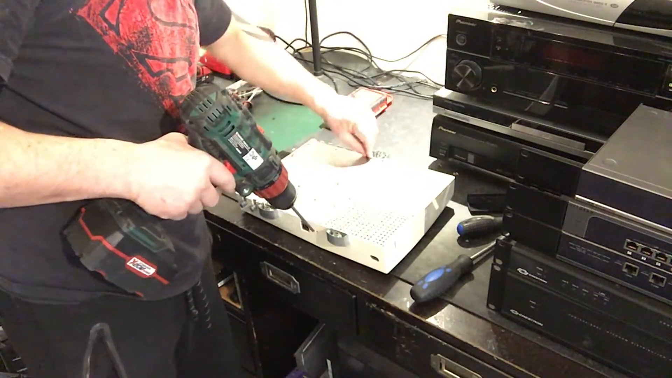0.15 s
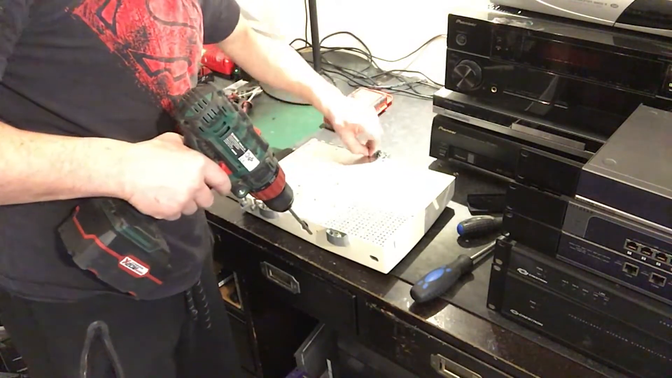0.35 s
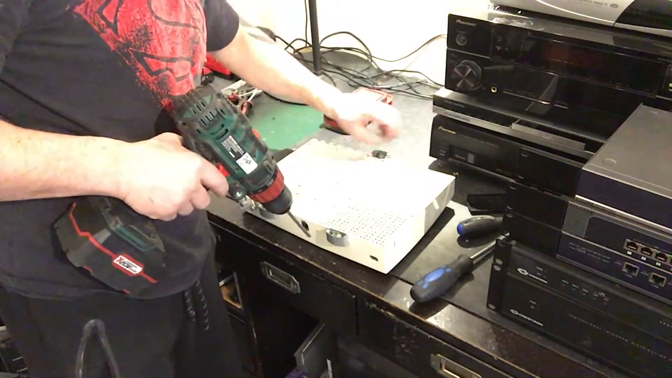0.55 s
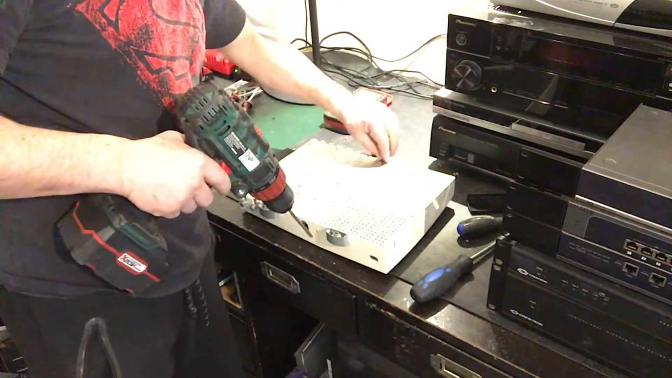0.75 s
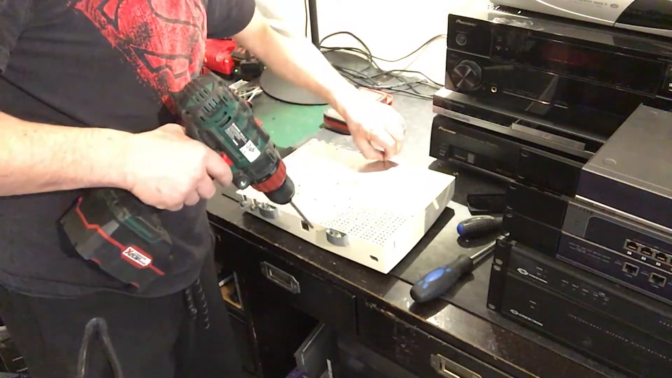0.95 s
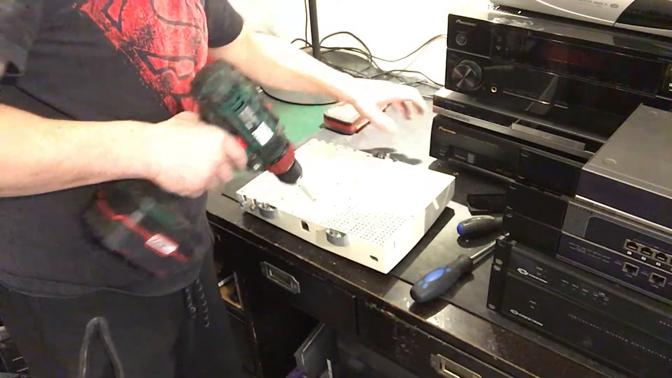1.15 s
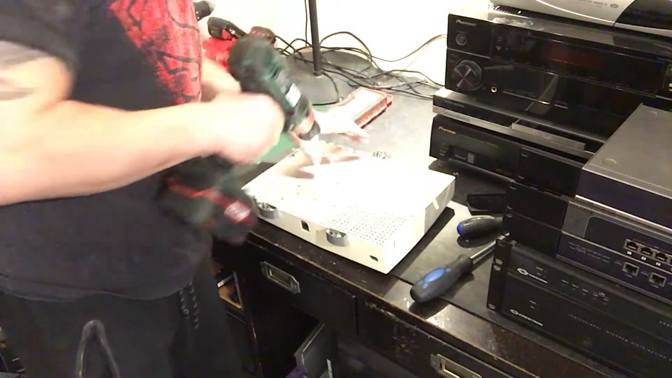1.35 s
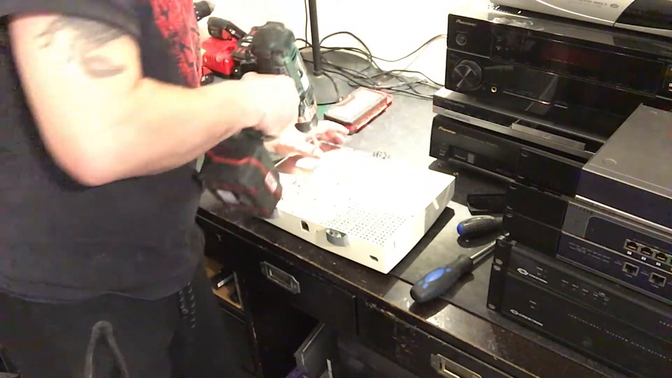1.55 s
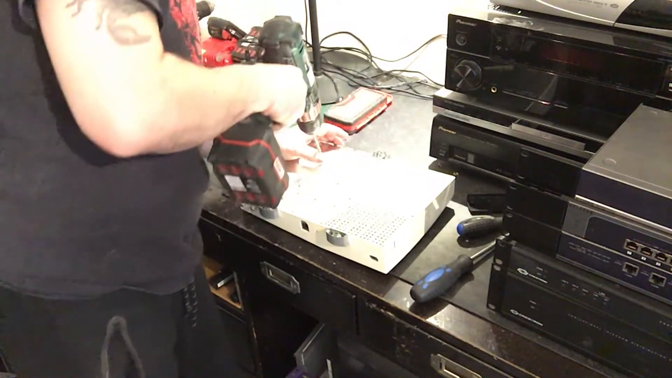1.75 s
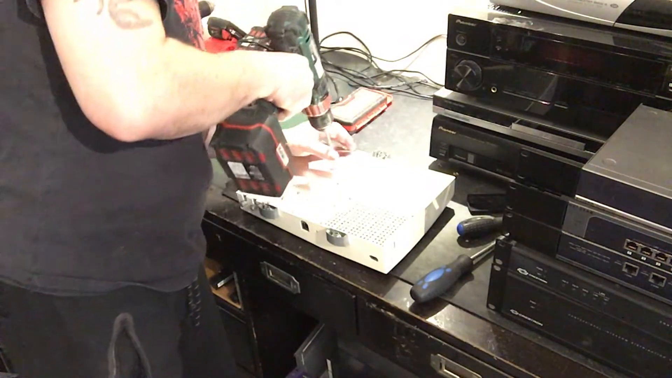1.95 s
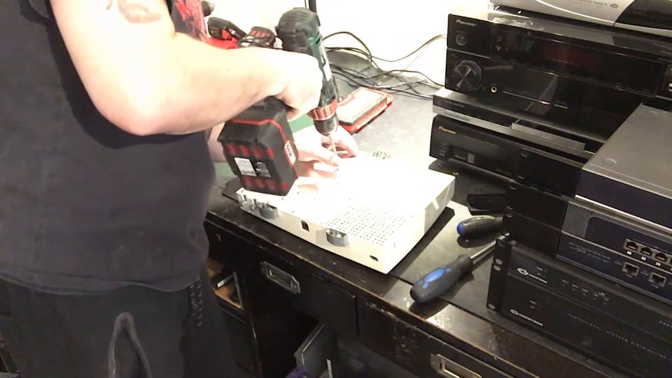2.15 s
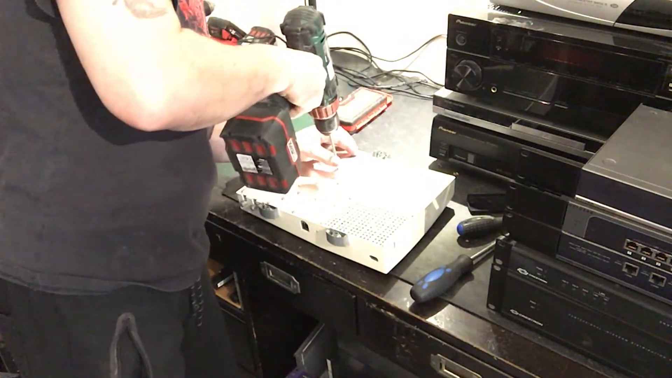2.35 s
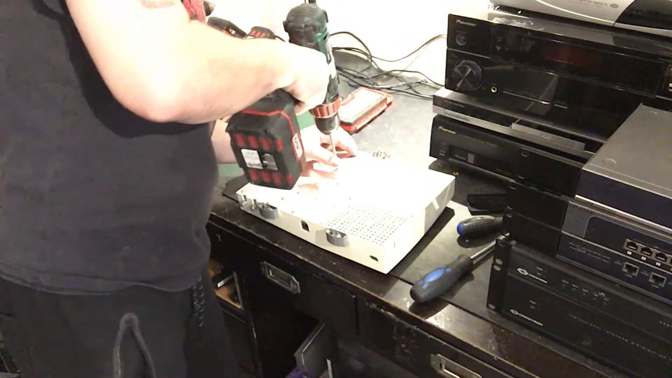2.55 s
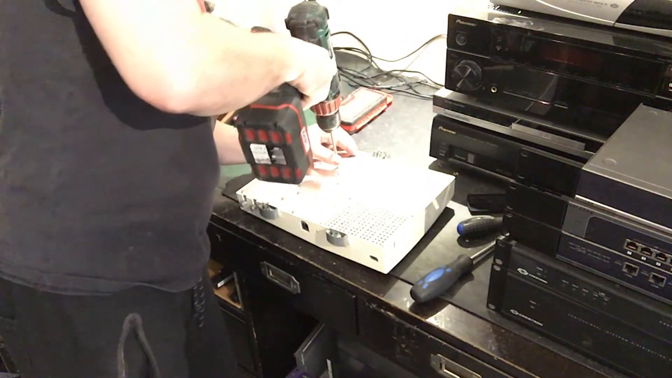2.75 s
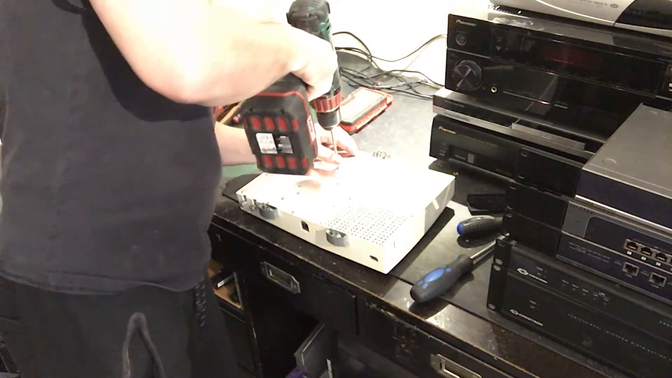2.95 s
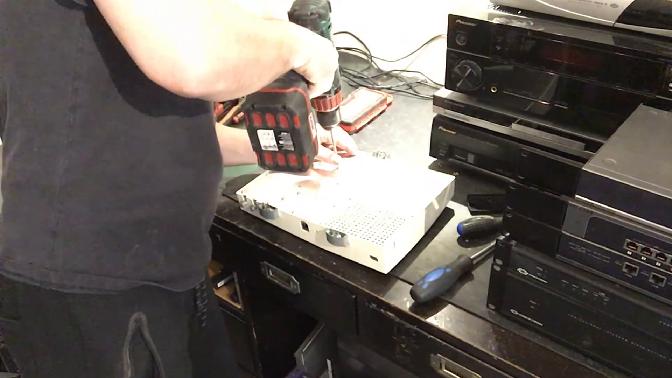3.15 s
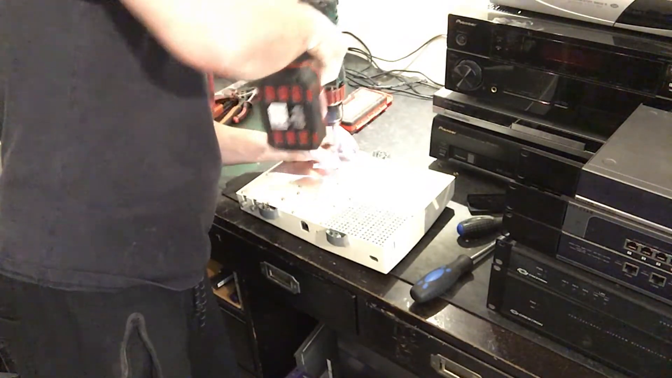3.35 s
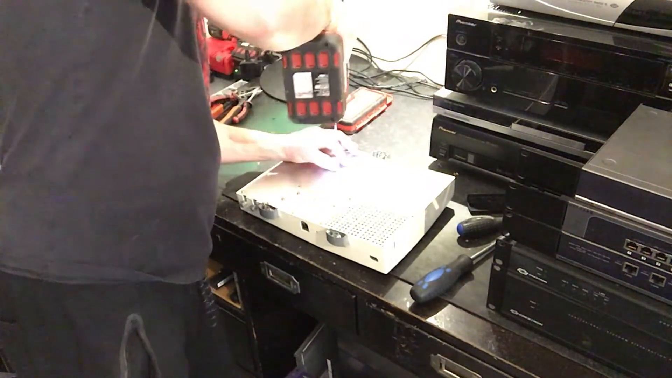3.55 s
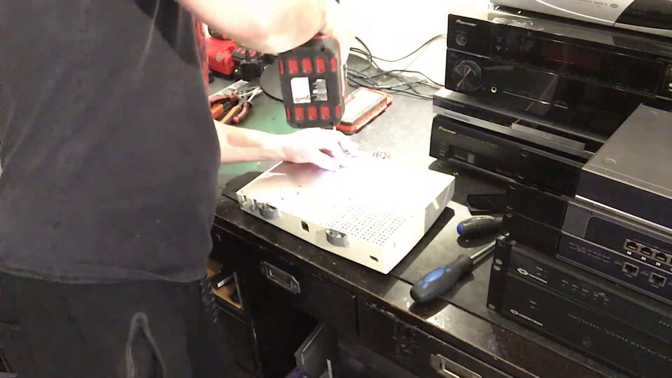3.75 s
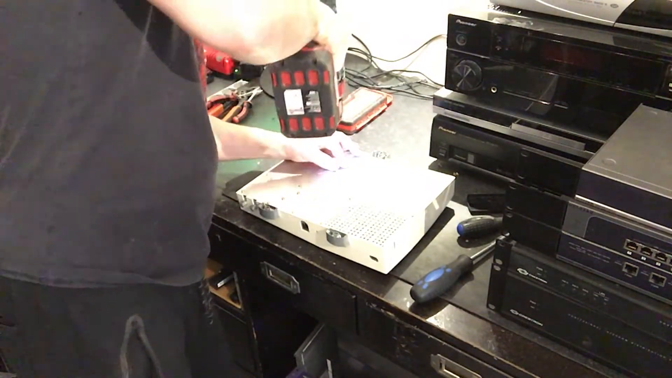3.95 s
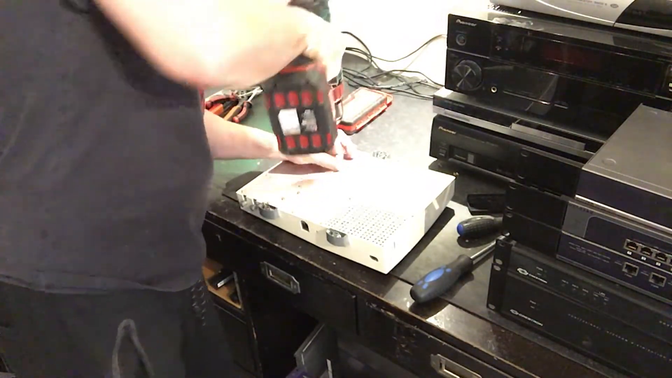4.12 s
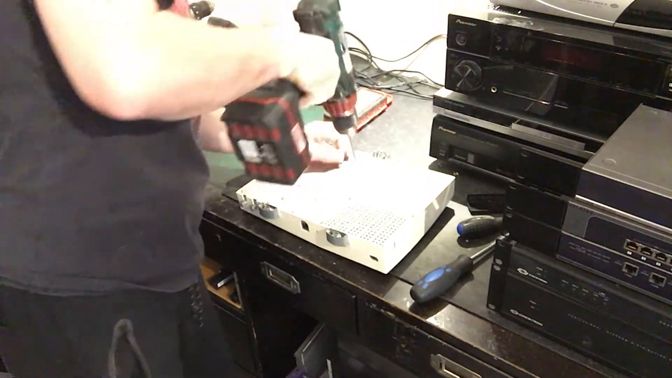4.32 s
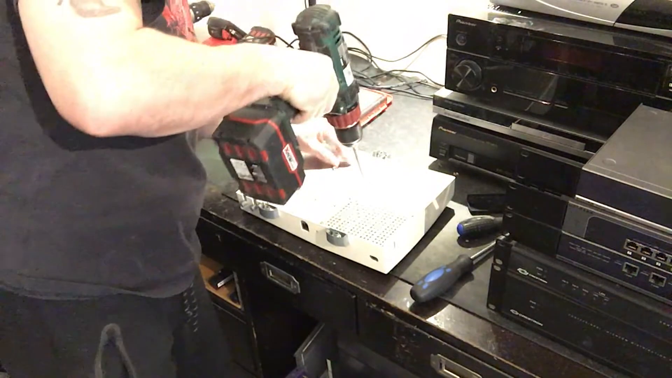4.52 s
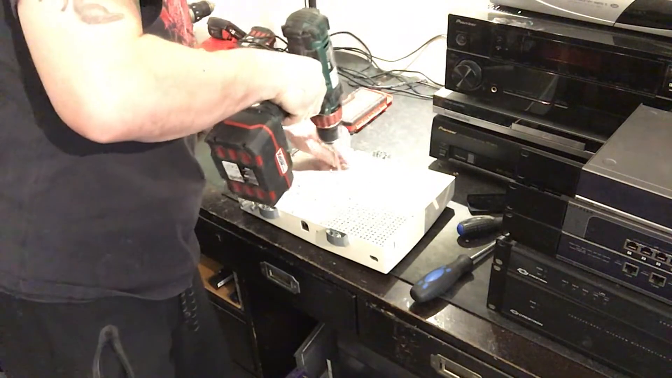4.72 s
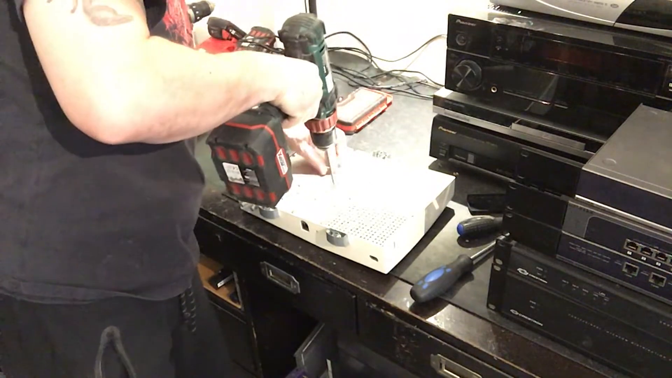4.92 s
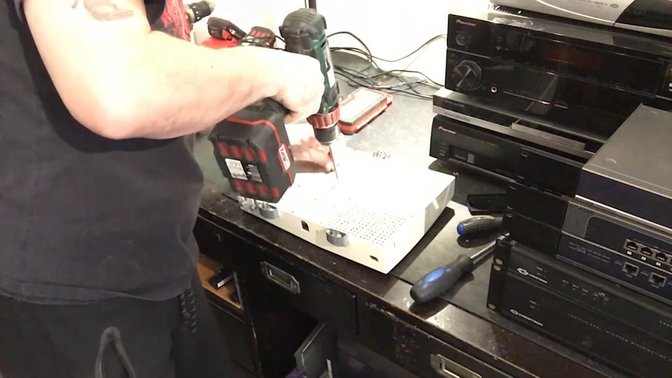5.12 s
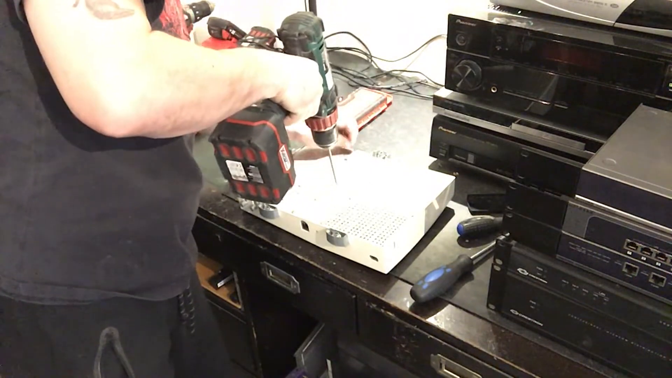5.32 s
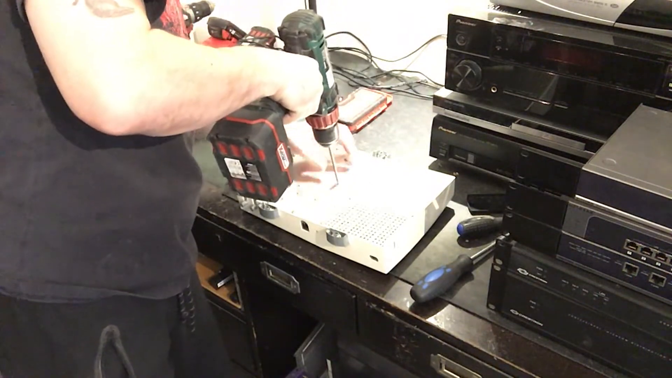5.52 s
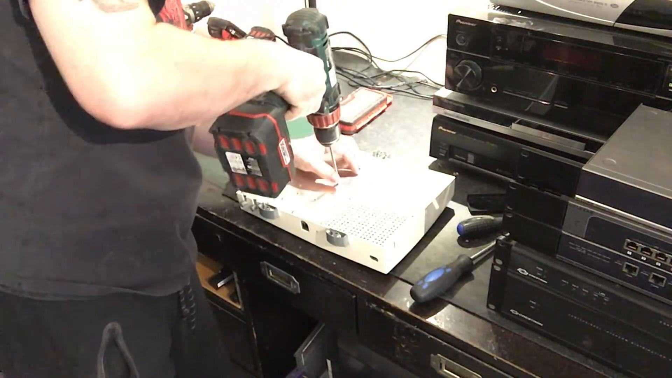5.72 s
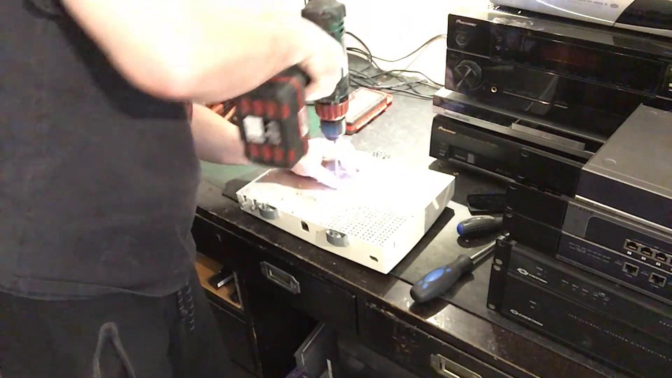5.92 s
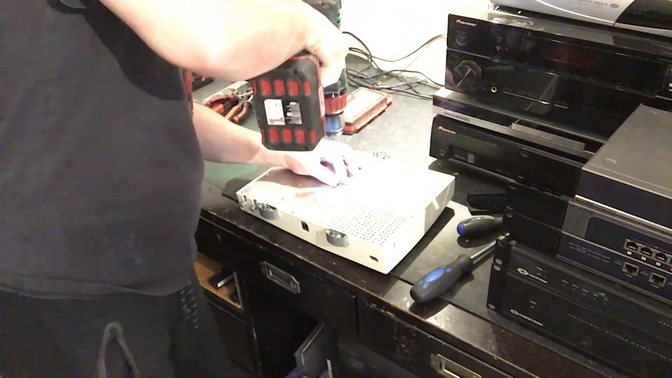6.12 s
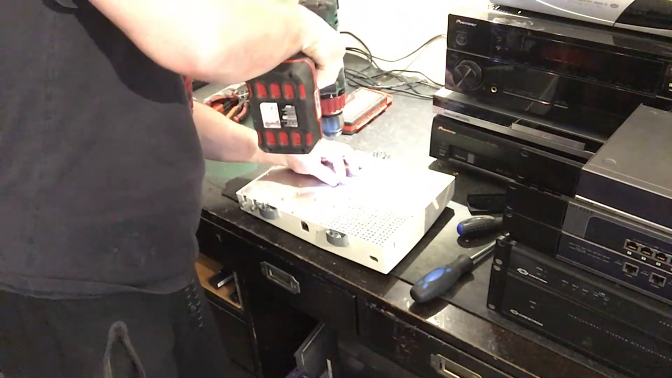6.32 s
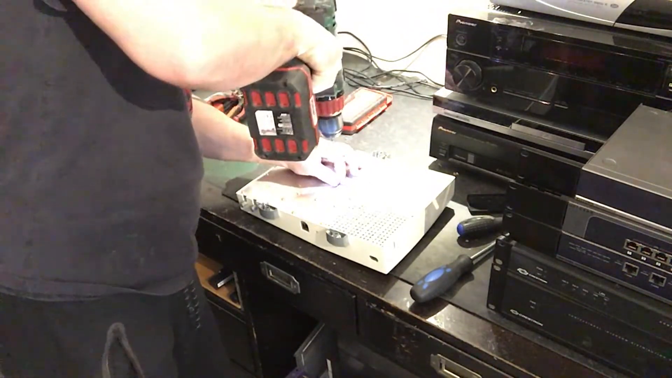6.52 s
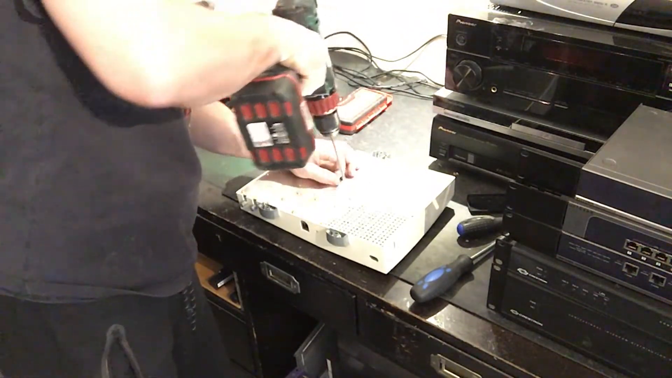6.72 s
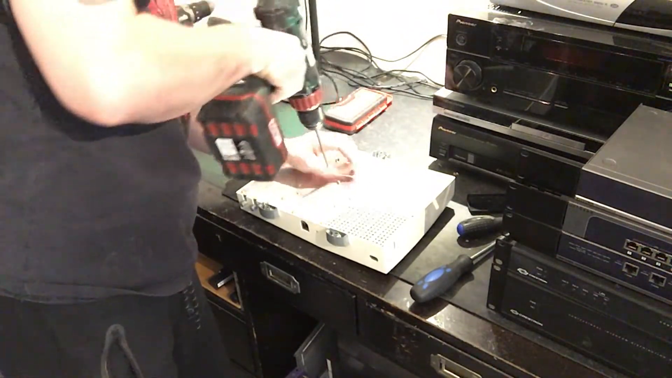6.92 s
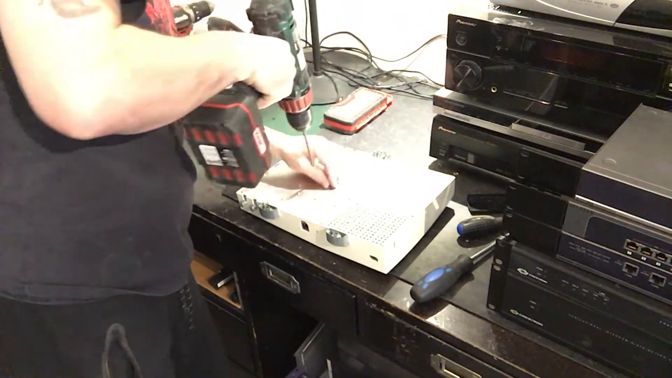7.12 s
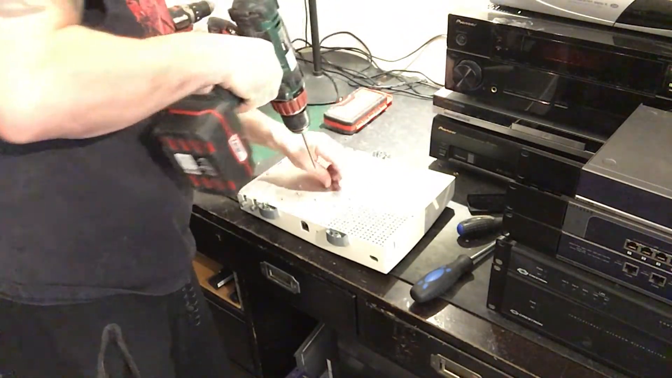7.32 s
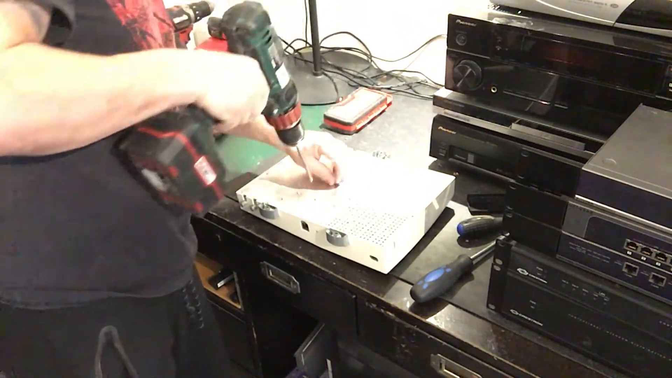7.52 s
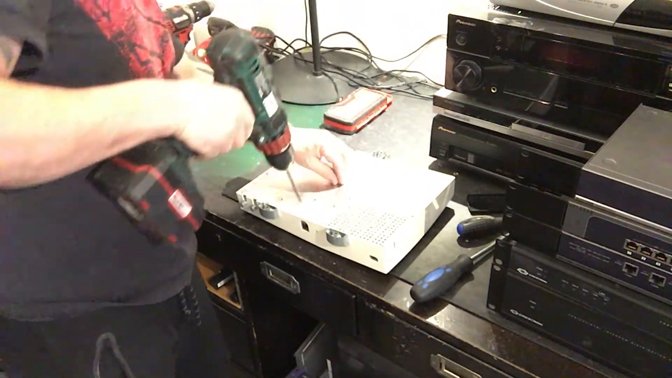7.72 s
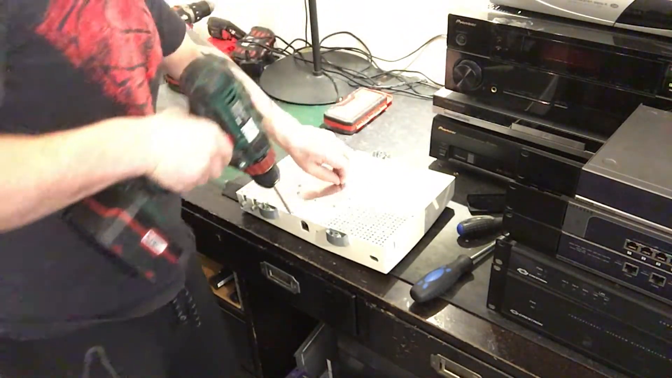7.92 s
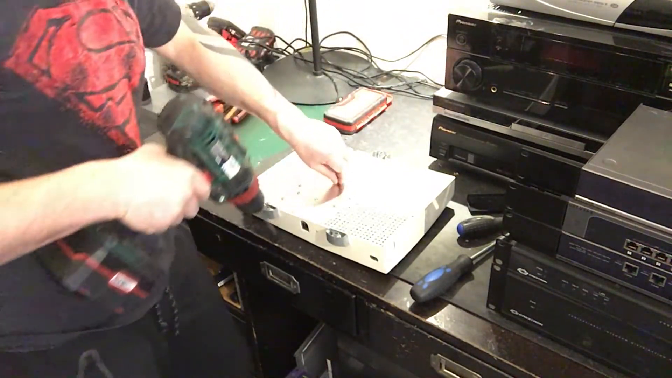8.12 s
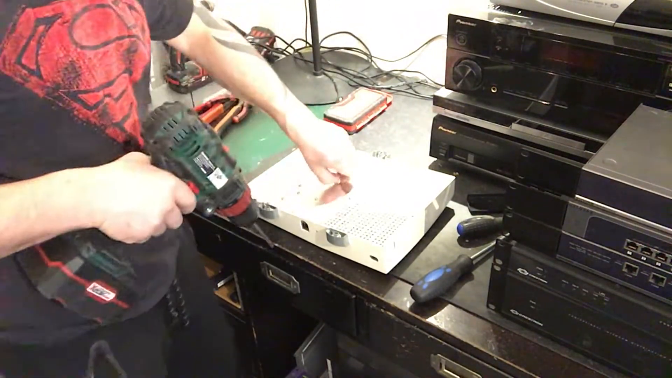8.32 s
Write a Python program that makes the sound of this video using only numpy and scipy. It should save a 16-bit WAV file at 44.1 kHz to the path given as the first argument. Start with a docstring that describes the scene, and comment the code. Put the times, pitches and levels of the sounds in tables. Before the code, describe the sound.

Taps and scrapes on a plastic case on a workbench, with two brief runs of a cordless screwdriver, each stopping with a clack.

```python
"""A cordless drill-driver backs two screws out of a plastic casing on a workbench in a small room.
Each time, its gear teeth clatter under a thin whine for most of a second, the loosened screw bumps
over its thread, and the brake stops the motor with a clack. The bit knocks about to find each screw
head, and firm knocks make the bench boom. In between, fingers slide over the lid and handle loose screws."""
import sys
import numpy as np
from scipy import signal
from scipy.fft import rfft, irfft, next_fast_len
from scipy.io import wavfile

SR = 44100
rng = np.random.default_rng(int(sys.argv[2]) if len(sys.argv) > 2 else 0)


def generate_wav(sig):
    """Save sig (samples, or channels by samples) to the path in sys.argv[1] as 16-bit PCM at SR."""
    pcm = np.round(np.clip(np.atleast_2d(sig).T, -1, 1) * 32767).astype(np.int16)
    wavfile.write(sys.argv[1], SR, pcm)


N = 373527

# One squeeze of the trigger per screw. Each row: pull in seconds, release in seconds,
# top speed in motor turns per second, speed wobble as a fraction, level in dB.
RUNS = [(3.527, 4.213, 455, .025, -32.5), (5.997, 6.705, 441, .004, -29.5)]
# The tone of the gear clatter in each run. Each row: frequency in Hz, relative level in dB.
FIRST_COLOUR = [(88, -38), (150, -1.5), (193, -9), (248, -5), (285, -12), (373, -4.5), (481, -23.5),
                (583, -8.5), (722, -13.5), (1760, -3), (2550, -6), (2810, -3), (7270, -12), (10300, -23.5),
                (15500, -27.5)]
SECOND_COLOUR = [(88, -52), (150, -12), (258, -7), (471, -16), (607, -7), (966, -9.5), (1700, -1),
                 (2270, -4.5), (3040, 0.5), (4560, -5.5), (5440, -8), (7270, -9.5), (10300, -20.5),
                 (13800, -23), (15500, -26)]
def drill():
    """The drill runs twice, with a slightly different tone on each screw."""
    out = np.zeros(N)
    add(out, *gear_noise(RUNS[0], FIRST_COLOUR, whine_db=-4.0, pattern_db=-11.0))
    add(out, *gear_noise(RUNS[1], SECOND_COLOUR, whine_db=-2.0, pattern_db=-8.5))
    return out


def motor(pull_s, release_s, top_speed, db, spin_up_s=.016, brake_s=.115):
    """The motor spins up, holds its speed and is braked. Gives its speed and noise level over time."""
    t = np.arange(pull_s, release_s + brake_s, 1 / SR)
    spin_up = 1 - np.exp(-(t - pull_s) / spin_up_s)
    braking = np.clip(1 - (t - release_s) / brake_s, 0, 1)
    share = spin_up * braking
    speed_db = 9 * np.log2(share + 1e-6)   # twice as fast is 9 dB louder
    swell_db = 1.5 * (t - t.mean())   # a little louder as the screw comes out
    return top_speed * share, db + speed_db + swell_db


# Pitches that the drill's housing boosts. Each row: frequency in Hz, width in Hz, boost in dB.
HOUSING = [(1732, 100, 0), (2183, 39, 3.5), (2778, 250, 2.5), (3040, 200, 0.5), (3805, 99, 1.5),
           (4300, 1200, 3), (5470, 32, 3), (5920, 240, 4.5), (7190, 270, 3.5), (8240, 33, 5),
           (11700, 600, 5), (13700, 600, 6.5)]
# The whine of motor contacts and gear teeth. Each row: multiple of the motor speed, relative level in dB.
WHINE = [(2, -22), (4, -19.5), (4.88, -19.5), (6, -19.5), (6.92, -15), (8.63, -18.5), (9.07, -17),
         (10.13, -14.5), (12, -23.5), (16.2, -30)]
def gear_noise(run, colour, whine_db, pattern_db, flutter=0.12):
    """Gear teeth rattle in the housing at a rate set by the motor, under a thin whine."""
    pull_s, release_s, top_speed, wobble, run_db = run
    speed, level_db = motor(pull_s, release_s, top_speed, run_db)
    n = len(speed)
    turns = np.cumsum(speed * (1 + wobble * slow_noise(n, 6))) / SR
    # tiny flaws in the gears come round every five motor turns; loose teeth also strike at random
    flaws = rng.standard_normal(700)
    pattern = flaws[(turns / 5 % 1 * len(flaws)).astype(int)]
    teeth = grains(18 * speed, spread_db=1.0) + from_db(pattern_db) * pattern
    # the load swings as the chuck (the bit holder) and motor turn; slack in the gears makes it chatter
    chuck_swing = 1 + flutter * np.sin(2 * np.pi * turns / 23.0) / 2
    motor_swing = 1 + flutter * np.cos(2 * np.pi * turns)
    chatter = from_db(1.1 * slow_noise(n, 120))
    clatter = coloured(teeth * chuck_swing * motor_swing * chatter, colour, HOUSING)
    # the shifting load favours now one part of the housing, now another
    for edges_hz in [(1400, 2300), (2500, 3400), (3800, 5000)]:
        clatter = clatter + .2 * slow_noise(n, 18) * band(clatter, edges_hz)
    whine = sum(from_db(db) * np.sqrt(2) * np.sin(2 * np.pi * (multiple * turns + rng.random()))
                for multiple, db in WHINE)
    return pull_s, from_db(level_db) * (clatter + from_db(whine_db) * whine)


# Clacks in the gearbox. Each row: start in seconds, treble level in dB, top treble level in dB.
CLACKS = [(3.5435, -38, -78), (4.2066, -24, -46.5), (4.222, -24.5, -43.5), (6.0246, -28, -57),
          (6.705, -29, -49.5), (6.7203, -26.5, -46), (6.7264, -27, -43.5), (6.7688, -32, -71)]
# How the gearbox rings. Each row: frequency in Hz, relative level in dB, ring time in seconds.
GEARBOX_TONES = [(1760, -8, .015), (2780, -3, .015), (3600, 0, .015), (4300, 0, .015), (5350, -3, .015),
                 (7250, -9, .015)]
def clacks():
    """Metal parts hit each other as the gearbox takes up load or brakes."""
    out = np.zeros(N)
    for start, treble_db, top_db in CLACKS:
        levels_db = [treble_db - 26, treble_db - 16.5, treble_db, top_db]
        add(out, start, strike(GEARBOX_TONES, levels_db, crack_db=10.0, crack_s=0.062))
    return out


# When each screw spins free. Each row: start in seconds, end in seconds, base level in dB.
FREE_SPINS = [(3.949, 4.205, -39.5), (6.364, 6.63, -36)]
def thread_drops(gear_ratio=21.5):
    """A loose screw falls off the end of its thread at every turn of the chuck and bumps the casing."""
    out = np.zeros(N)
    for (first_s, end_s, db), (_, _, motor_speed, _, _) in zip(FREE_SPINS, RUNS):
        for start in np.arange(first_s, end_s, gear_ratio / motor_speed):
            drop_db = db + 0.3 * rng.standard_normal()
            bump = strike(CASING_TONES, [drop_db - 3.5, drop_db - 3.0], crack_db=13.5, crack_s=0.071)
            add(out, start, bump)
            add(out, start, bench_boom(drop_db - 2.5))
    return out


# Screws squealing. Each row: start in seconds, length in seconds, pitch in Hz, level in dB.
SQUEALS = [(1.605, .09, 4600, -71.5), (3.62, 0.082, 2060, -40.5), (4.253, 0.036, 790, -43),
           (4.597, 0.011, 830, -45.5), (4.676, 0.021, 840, -54.5), (5.349, 0.041, 830, -51),
           (5.999, 0.016, 4400, -37.5), (6.06, 0.097, 4640, -34.5)]
def squeals():
    """A screw sticks and slips on the plastic: a narrow, unsteady tone that swells and fades."""
    out = np.zeros(N)
    for start, length_s, hz, db in SQUEALS:
        n = int(length_s * SR)
        tone = rms_one(band(rng.standard_normal(n), [hz - 140, hz + 140]))
        add(out, start, from_db(db) * np.hanning(n) ** .5 * tone)
    return out


# Firm knocks on the casing. Each row: start in seconds, level in dB, low cutoff in Hz,
# high cutoff in Hz, level of the bench's boom in dB.
KNOCKS = [(0.1745, -41.0, 2100, 2340, -52), (0.4985, -37, 585, 2720, -49.5),
          (0.8076, -44.5, 1070, 2450, -55), (0.8529, -52, 720, 3140, -55), (1.1174, -51, 270, 7200, -69),
          (2.5065, -38, 480, 1410, -46.5), (2.797, -35.5, 415, 1990, -43), (2.87, -38.5, 120, 1560, -44),
          (3.2546, -45.5, 370, 2730, -43.5), (3.391, -57.5, 120, 2270, -47.5),
          (3.5001, -38.5, 120, 2300, -37.5), (3.579, -22.5, 119, 5500, -34), (4.112, -41.5, 582, 2680, -35),
          (5.0219, -38.5, 269, 7850, -56.5), (5.4248, -39, 268, 6400, -58), (5.6978, -34, 440, 4950, -49),
          (5.8202, -44.0, 120, 2700, -49.5), (6.0026, -37.5, 270, 5500, -40.5),
          (6.045, -21.5, 120, 4700, -34.5), (6.659, -29, 270, 6400, -42)]
# How the casing rings. Each row: frequency in Hz, relative level in dB, ring time in seconds.
CASING_TONES = [(237, -8, .04), (330, 0, .04), (378, 1, .05), (460, -6, .04), (550, -7, .035),
                (660, -7, .04), (800, -2, .04), (905, -2, .05), (1087, -3, .035), (1350, -5, .03),
                (1550, -3, .035), (1850, -8, .025), (2400, -9, .025), (2750, -9, .025)]
def knocks():
    """Knocks ring the plastic shell and push on the bench."""
    out = np.zeros(N)
    for start, db, low_hz, high_hz, boom_db in KNOCKS:
        levels_db = band_levels(db, low_hz, high_hz, db_per_octave=-4)
        add(out, start, strike(CASING_TONES, levels_db, crack_db=8.5, crack_s=.05))
        add(out, start, bench_boom(boom_db))
    return out


# The bench's deep tones. Each row: frequency in Hz, relative level in dB,
# swell time in seconds (capped at 0.035 below).
BENCH_TONES = [(62.6, 0, 0.043), (122, 1, 0.021), (144.6, -6.5, 0.015)]
def bench_boom(db):
    """After a push, the bench's deep tones swell over a few cycles, then die away."""
    t = np.arange(SR // 3) / SR
    out = 0
    for hz, tone_db, swell_s in BENCH_TONES:
        age = t / np.clip(swell_s, .008, .035)
        swell = age ** 3 * np.exp(3 * (1 - age))   # peaks at age 1
        out = out + from_db(tone_db) * swell * np.sin(2 * np.pi * (hz * t + rng.random()))
    return from_db(db) * out


# The bit touches a screw head; a screw falls on the bench. Each row: start in seconds, level in dB.
BIT_TOUCHES = [(3.1028, -45.5), (3.2542, -56)]
SCREW_FALLS = [(.085, -44)]
# How the bit and the screw ring. Each row: frequency in Hz, relative level in dB, ring time in seconds.
BIT_TONES = [(1295, -5.5, 0.049), (1460, 2.5, 0.041), (3070, -5, 0.04), (3650, -7, .035),
             (7240, -17, 0.065)]
SCREW_TONES = [(787, -3, 0.11), (2640, 2, 0.059), (2927, 5, 0.068), (5922, -13, 0.036), (9819, -13, 0.083),
               (15090, -5, .09)]
def clinks(crack_db=-10.5, crack_s=.025):
    """The steel bit or a dropped screw ticks and rings briefly when it hits something."""
    out = np.zeros(N)
    t = np.arange(int(HIT_S * SR)) / SR
    for hits, tones in [(BIT_TOUCHES, BIT_TONES), (SCREW_FALLS, SCREW_TONES)]:
        for start, db in hits:
            ring = sum(from_db(tone_db - 60 * t / ring_s) * np.sin(2 * np.pi * hz * t)
                       for hz, tone_db, ring_s in tones)
            noise = rms_one(band(rng.standard_normal(len(t)), [1200, 4500]))
            crack = from_db(crack_db - 60 * t / crack_s) * noise
            add(out, start, from_db(db) * (ring + crack))
    return out


# Light clicks. Each row: start in seconds, level in dB, low cutoff in Hz, high cutoff in Hz,
# pitch of the touched spot in Hz.
CLICKS = [(0.0848, -49, 1140, 8900, 800), (0.3204, -59, 450, 3400, 890), (0.3483, -58.0, 120, 6100, 950),
          (1.3806, -42, 2080, 2300, 2650), (1.436, -49, 1940, 4700, 1100),
          (1.4931, -51.5, 1400, 2000, 1780), (1.5446, -56.5, 770, 2500, 905),
          (1.5821, -57.0, 1820, 2000, 1850), (3.4593, -51, 520, 2500, 766), (4.435, -52, 1820, 16000, 3030),
          (4.481, -62, 1820, 8900, 3130), (4.5981, -63.5, 400, 2600, 814), (4.6324, -59, 940, 13600, 803),
          (5.0784, -58, 550, 7600, 1500), (5.268, -59.0, 3300, 8000, 4430), (5.3561, -54.5, 720, 2600, 766),
          (5.4368, -48.5, 120, 2200, 3400), (5.7383, -42.5, 480, 1600, 896),
          (5.964, -65.5, 480, 8400, 2870), (5.985, -57, 120, 11000, 4520), (6.9616, -49.5, 550, 2900, 1830),
          (7.1533, -58.5, 1490, 3400, 1850), (7.557, -57.5, 1940, 2900, 2250),
          (8.0742, -57.5, 630, 11600, 1160), (8.3548, -50.5, 820, 5800, 2680),
          (8.3669, -55.0, 550, 2600, 876)]
# How a screw or bit rings on the lid. Each row: frequency in Hz, relative level in dB,
# ring time in seconds.
SMALL_PART_TONES = [(480, -8, .03), (900, -4, .05), (1280, -1, .04), (1900, -3, .03), (2650, -3, .025),
                    (3200, 0, .035), (4600, -5, .025), (7350, -3, .04)]
def clicks(spot_db=3.0, spot_ring_s=.03):
    """Screws, bit and fingernails tap lightly; each touched spot adds a short ring of its own."""
    out = np.zeros(N)
    for start, db, low_hz, high_hz, spot_hz in CLICKS:
        tones = SMALL_PART_TONES + [(spot_hz, spot_db, spot_ring_s)]
        levels_db = band_levels(db, low_hz, high_hz, db_per_octave=-1.5)
        add(out, start, strike(tones, levels_db, crack_db=13, crack_s=.07))
    return out


# Scrapes on the lid. Each row: loudest moment, rise time and fall time in seconds, level in dB.
SCRAPES = [(0.171, 0.03, 0.0035, -54), (0.935, 0.072, .1, -66), (1.022, 0.044, .08, -70),
           (1.8, .04, 0.041, -73), (1.962, .085, 0.034, -59.5), (3.481, 0.089, 0.088, -57.5),
           (4.599, .07, 0.013, -58), (4.634, .004, 0.041, -60), (4.68, .07, 0.04, -58),
           (5.278, 0.12, .07, -62), (5.37, .1, 0.03, -53), (5.412, .03, 0.024, -45.5),
           (7.158, .13, 0.15, -58), (7.222, 0.037, .1, -63)]
# The tone of a scrape. Each row: frequency in Hz, relative level in dB.
SCRAPE_COLOUR = [(290, -34), (500, -6.5), (676, -20), (769, -14), (1310, -14), (1800, -9.5), (2160, -13.5),
                 (3740, -11), (4570, -15.5), (5590, -17.5), (13200, -30), (15500, -33)]
# Pitches that a scrape sets ringing. Each row: frequency in Hz, width in Hz, boost in dB.
SCRAPE_RINGS = [(850, 160, 6), (4520, 340, 9.5)]
def scrapes(grains_per_s=3000.):
    """The bit and fingers drag over the lid, making a gritty stream of tiny impacts."""
    out = np.zeros(N)
    for row in SCRAPES:
        start, gain = stroke(*row)
        grit = grains(np.full(len(gain), grains_per_s), spread_db=3.5)
        add(out, start, gain * coloured(grit, SCRAPE_COLOUR, SCRAPE_RINGS))
    return out


# A fingertip glides over the lid; a hand shifts the casing.
# Each row: loudest moment, rise time and fall time in seconds, level in dB.
GLIDES = [(1.64, 0.13, .2, -72), (2.125, 0.1, 0.13, -67.5)]
SHIFTS = [(.4, 0.054, 0.13, -47.5), (.78, 0.085, 0.13, -57.5), (2.77, 0.044, .04, -56),
          (3.25, 0.13, .11, -51.5), (3.5, 0.14, .02, -65), (7.99, 0.33, .5, -68.5)]
# The tone of each movement. Each row: frequency in Hz, relative level in dB.
GLIDE_COLOUR = [(1000, -25), (3500, -3), (4800, 1), (6300, 0), (7500, -18), (15000, -30)]
SHIFT_COLOUR = [(30, -22), (65, 5), (100, -2), (150, -2.5), (200, 4), (290, -1), (500, -15), (1000, -20),
                (3000, -43), (9000, -60)]
def rubs():
    """Smooth rubbing: a fingertip hisses on the lid, and the casing rumbles on the bench."""
    out = np.zeros(N)
    for moves, colour in [(GLIDES, GLIDE_COLOUR), (SHIFTS, SHIFT_COLOUR)]:
        for row in moves:
            start, gain = stroke(*row)
            add(out, start, gain * coloured(rng.standard_normal(len(gain)), colour))
    return out


# How long the room echoes. Each row: frequency in Hz, seconds to fade by 60 dB.
ROOM_FADE = [(60, 0.57), (160, .33), (420, 0.2), (1100, 0.27), (3000, 0.23), (7500, 0.26), (15000, 0.26)]
def room(x, echo_db, build_s=0.0042, air_hz=9000):
    """Dense echoes build up quickly, then fade at a different rate in each frequency band."""
    t = np.arange(SR // 2) / SR
    edges = np.geomspace(40, 17000, 11)
    echoes = 0
    for low, high in zip(edges, edges[1:]):
        hz = np.sqrt(low * high)
        fade = from_db(-60 * t / at_hz(ROOM_FADE, hz)) / np.hypot(1, hz / air_hz)
        echoes = echoes + band(rng.standard_normal(len(t)), [low, high]) * fade
    echoes = echoes * (1 - np.exp(-(t / build_s) ** 2))
    echoes = echoes / np.sqrt(2 * np.sum(echoes ** 2))
    return x + from_db(echo_db) * signal.fftconvolve(x, echoes)[:N]


# The tone of the quiet room. Each row: frequency in Hz, relative level in dB.
BACKGROUND_COLOUR = [(15, -40), (25, -19), (69, -3.5), (119, -15), (156, -3), (240, -13), (322, -7.5),
                     (378, -13), (495, -20.5), (567, -15.5), (826, -19), (1530, -22.5), (2920, -25.5),
                     (5430, -30.5), (15500, -43)]
def background(db=-65.5):
    """A faint, steady rumble and hiss fills the room."""
    return from_db(db) * coloured(rng.standard_normal(N), BACKGROUND_COLOUR)


# The bands of a hit: low, middle, treble, top treble. Each row: lower edge in Hz, upper edge in Hz.
BANDS_HZ = [(200, 600), (600, 2300), (2200, 6500), (7000, 16000)]
ATTACK_S, HIT_S = .015, .12   # the opening part that sets a hit's level; its whole length
def strike(tones, levels_db, crack_db, crack_s):
    """One hit: a snap, a short crack and ringing tones, with a level for each band."""
    t = np.arange(int(HIT_S * SR)) / SR
    snap = from_db(crack_db - 60 * t / 0.0019)
    crack = from_db(crack_db - 60 * t / crack_s)
    sound = (snap + crack) * rng.standard_normal(len(t))
    for hz, db, ring_s in tones:
        # where the hit lands decides how strongly, and which way, each tone swings
        sign = rng.choice([-1, 1])
        fade = from_db(db + 3.5 * rng.standard_normal() - 60 * t / ring_s)
        sound += sign * fade * np.sin(2 * np.pi * hz * t)
    out = 0
    for edges, db in zip(BANDS_HZ, levels_db):
        # friction inside the material shortens the ring, most of all in the high bands
        part = band(band(sound, edges), edges) * from_db(-60 * t * edges[0] / 600)
        out = out + from_db(db) * part / np.std(part[:int(ATTACK_S * SR)])
    return out


def band_levels(db, low_hz, high_hz, db_per_octave):
    """The level of each band: a small part cannot ring low, and a soft touch cannot ring high."""
    hz = np.sqrt(np.prod(BANDS_HZ, axis=1))
    cuts_db = 10 * np.log10((1 + (low_hz / hz) ** 4) * (1 + (hz / high_hz) ** 6))
    shape_db = db_per_octave * np.log2(hz) - cuts_db
    return db + shape_db - shape_db.max()


def stroke(peak_s, rise_s, fall_s, db):
    """Start time and gain of a movement that swells 20 dB over its rise and fades 20 dB over its fall."""
    t = np.arange(-1.5 * rise_s, 1.5 * fall_s, 1 / SR)
    return peak_s + t[0], from_db(db - 20 * np.maximum(-t / rise_s, t / fall_s))


def grains(per_s, spread_db):
    """Tiny random impacts of uneven size at a given rate."""
    n = len(per_s)
    hits = rng.random(n) < per_s / SR
    return rms_one(hits * rng.choice([-1, 1], n) * from_db(spread_db * rng.standard_normal(n)))


def coloured(x, colour, boosts=()):
    """Shape a sound's tone with a smooth curve and boosted pitches; its power comes out as 1."""
    size = next_fast_len(len(x))
    hz = np.arange(size // 2 + 1) * SR / size
    boost_db = sum(db / (1 + (2 * (hz - centre) / width) ** 2) for centre, width, db in boosts)
    spectrum = rfft(x, size) * from_db(at_hz(colour, hz) + boost_db)
    return rms_one(irfft(spectrum, size)[:len(x)])


def slow_noise(n, hz):
    """A smooth random wobble, mostly slower than the given rate."""
    return rms_one(signal.sosfilt(signal.butter(2, hz, fs=SR, output="sos"), rng.standard_normal(n)))


def band(x, edges_hz):
    """Keep the frequencies between two edges."""
    return signal.sosfilt(signal.butter(2, edges_hz, "band", fs=SR, output="sos"), x)


def at_hz(points, hz):
    """Read between a table's rows, giving each octave equal room."""
    freqs, values = np.transpose(points)
    return np.interp(np.log(np.maximum(hz, 1)), np.log(freqs), values)


def from_db(db):
    """Turn decibels into a gain."""
    return 10 ** (np.asarray(db) / 20)


def rms_one(x):
    """Scale a sound to an average power of 1."""
    return x / np.sqrt(np.mean(x ** 2) + 1e-20)


def add(out, start_s, sound):
    """Mix a sound in at a given time."""
    start = int(round(start_s * SR))
    out[start:start + len(sound)] += sound[:N - start]


def scene():
    """All the sources in the room, the same in both channels."""
    quiet = background()
    drilling = drill() + clacks() + squeals()
    contacts = knocks() + thread_drops() + clinks() + clicks() + scrapes() + rubs()
    mono = room(drilling, echo_db=-8.0) + room(contacts, echo_db=-5.0) + quiet
    return np.stack([mono, mono])


def record(dry, cutoff_hz=15900):
    """A steep filter removes the very highest treble."""
    return signal.sosfilt(signal.ellip(12, .1, 70, cutoff_hz, fs=SR, output="sos"), dry)


dry = scene()
out = record(dry)
generate_wav(out)
```